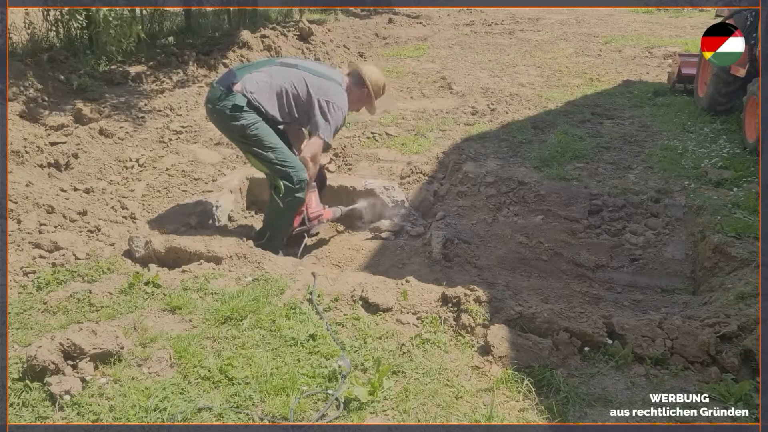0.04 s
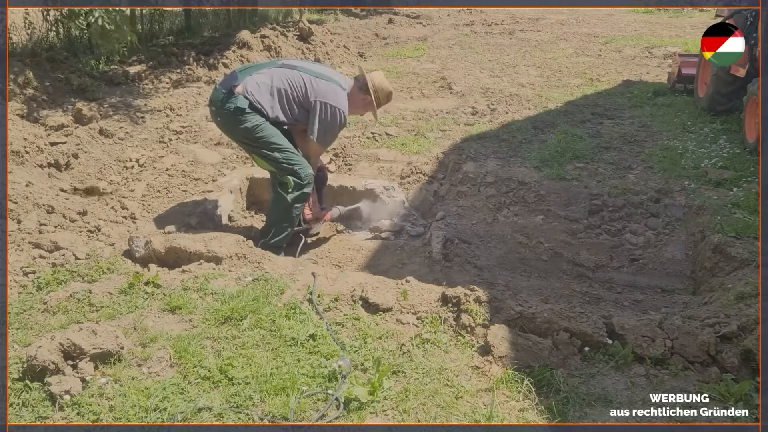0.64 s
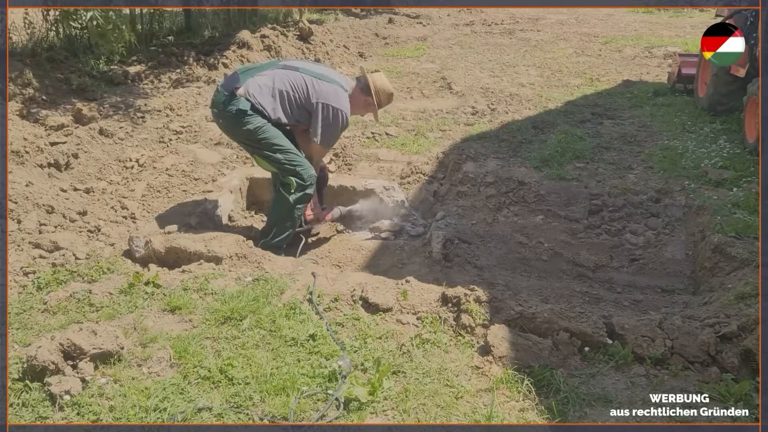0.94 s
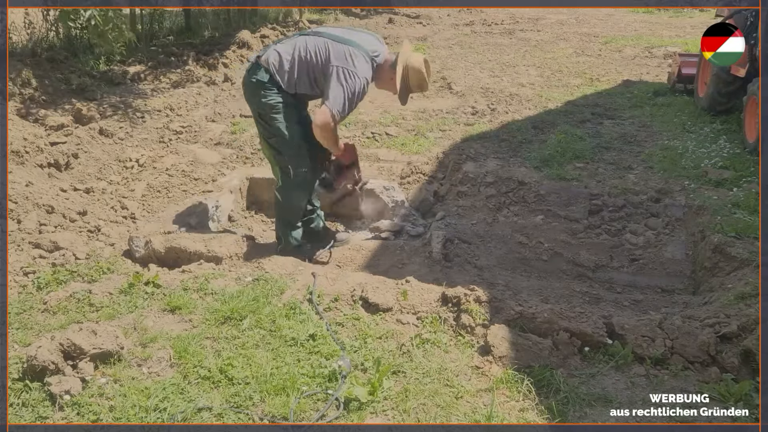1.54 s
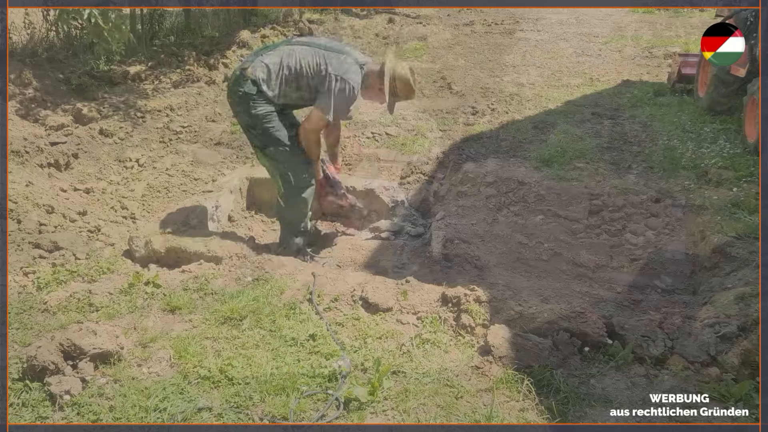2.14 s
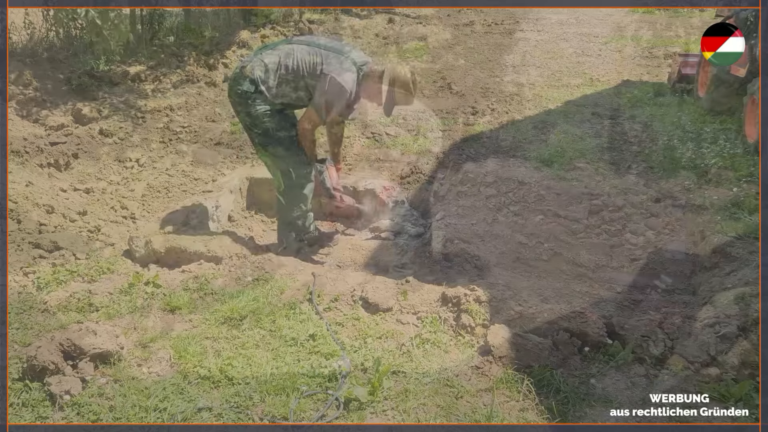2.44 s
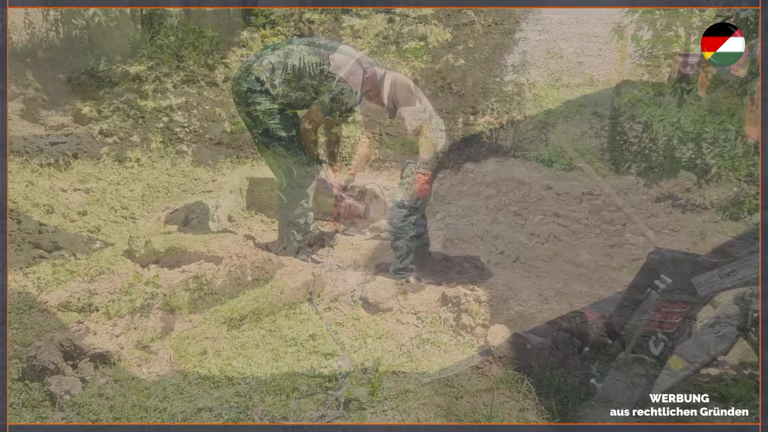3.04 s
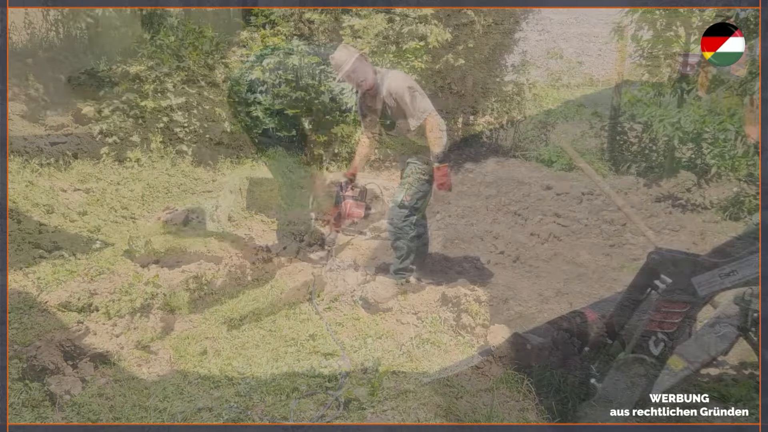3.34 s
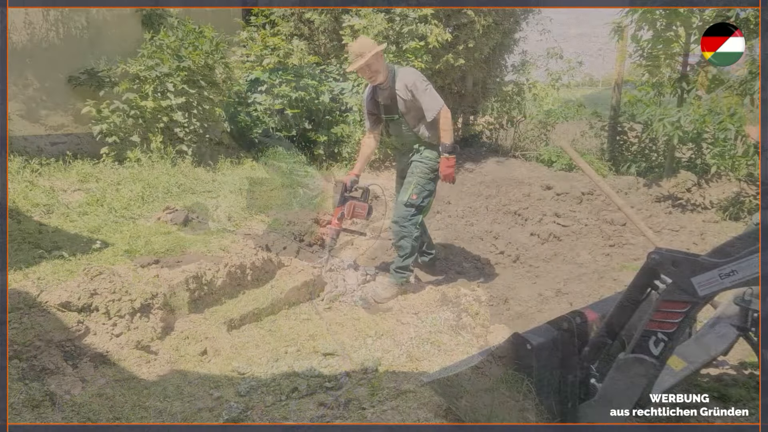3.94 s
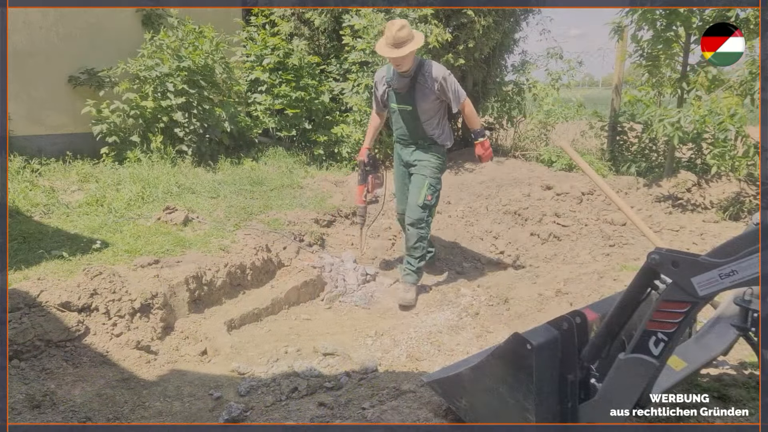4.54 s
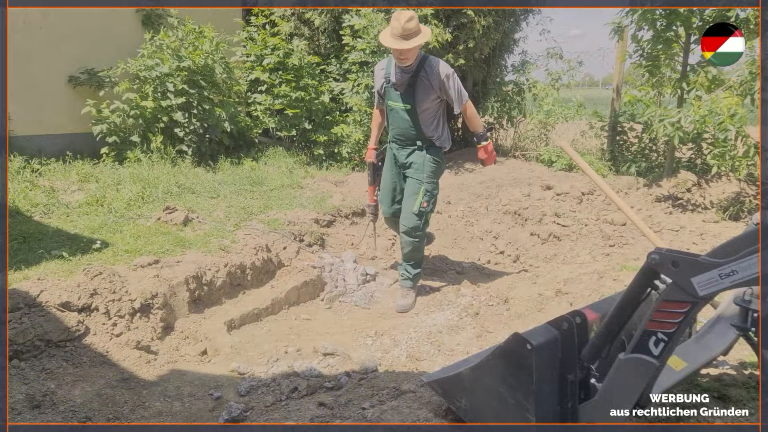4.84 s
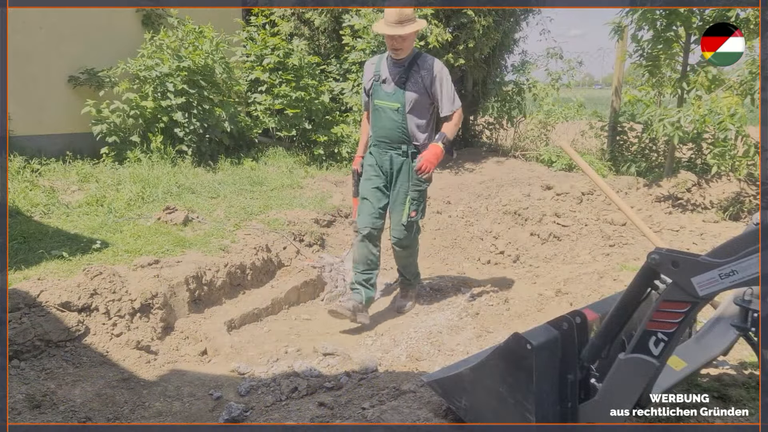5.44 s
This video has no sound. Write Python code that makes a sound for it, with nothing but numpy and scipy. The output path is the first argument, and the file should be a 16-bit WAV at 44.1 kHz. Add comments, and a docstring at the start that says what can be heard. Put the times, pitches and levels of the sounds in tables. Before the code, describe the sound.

An electric demolition hammer pounds a concrete slab in a garden, close by. Very fast blows thump and rattle, with a ringing steel chisel, cracking concrete and spraying grit. It stops briefly with a motor whir, then hammers again in several bursts that fade steadily to nothing. At the end a boot scuffs softly on dry soil, and a diesel engine idles very faintly far off in still air.

```python
"""An electric demolition hammer chisels a concrete slab in a garden, in short bursts that fade away.
Each turn of the crank thumps the slab, knocks the housing, rings the chisel and crushes grit.
Pieces split off, the steel rings bright when it bounces clear, and between bursts the motor whirs.
Underneath, a diesel idles far off in still air; boots scuff the dry soil at the end."""
import sys
import numpy as np
from scipy import signal
from scipy.fft import rfft, irfft, next_fast_len
from scipy.io import wavfile

SR = 44100
rng = np.random.default_rng(int(sys.argv[2]) if len(sys.argv) > 2 else 0)


def write(x):
    x = np.atleast_2d(x).T
    wavfile.write(sys.argv[1], SR, np.round(np.clip(x, -1, 1) * 32767).astype(np.int16))


N = 250468
TIME = np.arange(N) / SR

# EQ curves for garden air, a dragging sole, fan air, crushed concrete, fine grit and coarse gravel.
# Each row: frequency in Hz, gain in dB.
GARDEN_EQ = [(15, -65.5), (25, -25.5), (80, -9.5), (114, -18), (153, -24.5), (236, -29.5), (463, -35),
             (840, -34), (936, -36.5), (1070, -32.5), (1940, -35), (2610, -45.5), (16000, -70.5)]
SOLE_EQ = [(800, -3), (2500, 0), (3900, -12), (4700, 0), (5600, 1), (6600, -8), (8400, -5), (10000, -27),
           (15000, -30.5)]
FAN_EQ = [(59, -57.5), (100, -13), (295, -16.5), (535, -4.5), (891, -6), (970, -2), (1330, -6), (1800, 0),
          (2690, -8.5), (7770, -16.5), (9610, -28), (16000, -23.5)]
CRUSH_EQ = [(30, -3), (60, -20), (250, 7), (430, -7.5), (900, -3.5), (1500, 5.5), (2200, 7.5), (2900, 2.5),
            (4000, -1.5), (5200, 1), (7500, 7), (10000, 2), (13000, -26), (16000, -31.5)]
GRIT_EQ = [(2000, -24.5), (6000, -16.5), (9000, -5.5), (12500, 3), (13500, 7), (14200, -8.5), (15700, -2),
           (16000, -4.5)]
GRAVEL_EQ = [(1500, -26.5), (3000, -7), (3700, 0), (4700, -1), (5600, -7.5), (9000, -21)]
# EQ curves for the slab's thump, a bounce's tick and a split's snap, with the same columns.
THUMP_EQ = [(45, 5), (90, -5), (130, 7.5), (400, -4), (900, -26.5)]
TICK_EQ = [(1000, -33.5), (4500, -7), (6600, 2.5), (9000, 4), (10300, -10), (12000, -29.5)]
SNAP_EQ = [(200, -14), (1500, -8.5), (8000, -5), (15000, -29)]
# Noise bands for soil and fragments. Each row: multiple of the centre frequency, gain in dB.
SOIL_BAND = [(1 / 8, -20), (1 / 2, -12), (1, 0), (2, -16), (4, -40), (16, -65)]
DEBRIS_BAND = [(1 / 8, -30), (1 / 2, -8), (1, 0), (1.6, -9), (2.5, -35), (5, -70)]
# Partials of the idling diesel and of the free chisel. Each row: pitch in Hz, level in dB.
DIESEL_TONES = [(68.5, -58.5), (82, -59), (154, -68), (365, -78.5)]
FREE_CHISEL_TONES = [(4161, -21), (6690, -14), (8775, -3.5), (8815, -16), (9720, -25), (13070, -18)]
# Resonances of slab, housing and chisel. Each row: pitch in Hz, bandwidth in Hz, relative level in dB.
SLAB_MODES = [(141, 56, -7.5), (177, 17, 0), (228, 20, -14), (319.7, 22, -8), (350, 6.7, -2)]
HOUSING_MODES = [(526, 12, -19), (546, 23, 3.5), (692, 13, 4), (743, 77, -12.5), (844, 100, -2.5),
                 (1026, 33, -2.5), (1167, 41, -5.5), (1430, 200, -3.5), (1610, 110, -4.5)]
CHISEL_MODES = [(3480, 110, -11), (4230, 190, -4), (6520, 120, -3), (6690, 100, 1.5), (7735, 70, -9),
                (8785, 60, -8), (9720, 150, -1), (13090, 140, 1)]
# Soil shifts under tool and boots; the row at 4.272 s gives the dull low body of a concrete split. Each row:
# time and half width in seconds, centre in Hz, level in dB.
SOIL_SCUFFS = [(1.141, 0.011, 166, -23), (1.36, 0.015, 490, -45.5), (1.377, 0.0083, 250, -49),
               (2.144, 0.027, 74.6, -50), (2.187, 0.028, 66.4, -39), (4.13, 0.039, 85.1, -44),
               (4.272, 0.0074, 1103, -42.5), (5.586, .004, 1710, -56.5), (5.609, 0.0025, 1200, -48.5),
               (5.625, 0.016, 1185, -58.5)]
# Fragments scrape as the tool is shifted. Each row: start and decay in seconds, centre in Hz, level in dB.
DEBRIS_SLIDES = [(1.322, 0.0096, 4010, -54.5), (1.343, 0.0077, 5000, -54), (1.384, .004, 5500, -65),
                 (1.402, .008, 1670, -49), (1.426, .006, 4050, -63), (4.375, .006, 2570, -57)]
# The trigger is let go. Each row: release in seconds, next squeeze in seconds.
TRIGGER_RELEASES = [(1.243, 1.435), (4.295, 4.388)]
# The motor runs free between bursts. Each row: start in seconds, fan level in dB, fan treble in dB,
# nominal whine pitch in Hz, whine level in dB.
FREE_RUNS = [(1.1, -28, 2, 1141, -42), (1.95, -25, 2.5, 996, -35.5), (3.18, -26, 2.5, 1015, -46),
             (3.4, -28.5, 2, 1040, -34), (4.18, -34, -1, 1070, -55)]
# The crank slows where the tool is leaned on hardest. Each row: time in seconds, blows per second.
CRANK_RATE = [(0, 44.2), (.5, 44.4), (.9, 45), (1.5, 44.2), (1.85, 45.4), (2.2, 44.5), (2.6, 42.4),
              (2.9, 45.2), (3.3, 44.7), (4.0, 44)]
# The tip bites bare concrete. Each row: time and half width in seconds, level in dB.
TIP_BITES = [(1.472, .00045, -3), (1.4752, .003, -20), (1.4784, .0012, -8.5), (3.4465, .0006, -8)]
# The chisel bounces clear. Each row: start in seconds, time in the air in seconds, level in dB.
CHISEL_BOUNCES = [(0.076, 0.05, -15.5), (0.149, 0.025, -17), (1.945, 0.031, -9.5), (2.098, 0.025, -13.5),
                  (2.134, 0.028, -16), (2.169, 0.018, -16), (2.217, 0.015, -19), (2.241, 0.013, -14),
                  (2.284, .02, -18), (2.378, 0.027, -22.5), (2.49, .02, -23), (3.281, 0.0066, -18),
                  (3.293, 0.01, -19), (3.303, 0.041, -13.5), (3.345, 0.04, -19), (3.384, 0.024, -16),
                  (3.408, 0.0043, -19), (3.446, 0.016, -14), (3.465, 0.0057, -13), (3.485, 0.0073, -25),
                  (3.508, 0.017, -14.5), (3.533, 0.0086, -22)]
# Large pieces of concrete break off. Each row: time in seconds, level in dB.
CONCRETE_SPLITS = [(0.0483, -10), (0.3336, -9), (0.398, -7), (0.5734, -11), (0.8944, -9), (0.9634, -9),
                   (0.9705, -8), (1.0665, -11), (1.1204, -12), (1.6437, -6), (1.667, -9), (1.699, -5),
                   (1.841, -9), (1.7918, -7), (2.0986, -8), (2.3481, -11), (2.4598, -3), (2.5152, -9),
                   (2.589, -9), (2.6698, -9), (3.1692, -4.5), (3.5877, -8), (3.806, -9), (4.106, -9),
                   (4.2672, -20), (4.4214, -7)]
# The loose chisel clangs hard in its holder. Each row: time in seconds, pitch in Hz, level in dB.
HOLDER_CLANGS = [(0.212, 1740, -21), (.297, 1740, -13.5), (.334, 1740, -17.5), (.402, 1720, -12.5),
                 (.575, 1680, -12.5), (.617, 1740, -19.5), (.658, 1720, -20), (.69, 1720, -16),
                 (.743, 1720, -14), (0.794, 1750, -14), (0.821, 1740, -13.5), (0.894, 1740, -16.5),
                 (0.915, 1740, -17), (0.948, 1740, -17), (.97, 1700, -16), (1.04, 1740, -17.5),
                 (1.207, 1620, -25.5), (1.222, 1690, -22), (1.485, 1490, -14.5), (1.58, 1780, -18.5),
                 (1.643, 1780, -17), (1.666, 1760, -17.5), (1.674, 1760, -15.5), (1.697, 1780, -14.5),
                 (1.732, 1780, -15), (1.79, 1780, -13.5), (1.941, 1780, -16.5), (2.052, 1780, -28),
                 (2.07, 1780, -22), (2.095, 1780, -15), (3.215, 1780, -19.5), (4.6, 1730, -28)]
# The tip skids and the thump ducks. Each row: time and half width in seconds, thump change in dB.
TIP_SKIDS = [(0.035, 0.0078, -9.5), (0.19, 0.021, -2), (0.28, 0.017, -4.5), (0.41, 0.0088, -15),
             (1.655, 0.028, -6), (1.736, 0.024, -3.5), (1.83, .012, -21.5), (1.943, 0.011, -10.5),
             (2.265, .025, -3), (2.75, 0.072, 0), (2.96, .02, -5), (3.51, 0.027, -11)]
# The chisel is pressed on the slab. Each row: start, end and seating time in seconds, faders for thump,
# housing and ring in dB, ring pitch in Hz, chatter against the ring's tone in dB, then faders for
# high steel, crushing and fine grit in dB.
CHISEL_BURSTS = [ (-0.02, 1.126, 0.0033, -26, -28, -28, 1735, 2.5, -27.5, -23, -23.5),
                 (1.48, 1.971, 0.002, -30.5, -33, -28, 1772, -6.5, -25.5, -21, -27.5),
                 (2.098, 3.198, 0.092, -31, -32, -20.5, 1796, -4, -26.5, -24.5, -24.5),
                 (3.284, 3.398, 0.034, -30.5, -32.5, -30, 1739, -2, -28, -23.5, -41),
                 (3.483, 4.204, 0.03, -28.5, -30, -27.5, 1749, -2, -27, -23, -28),
                 (4.407, 4.794, 0.027, -41.5, -31.5, -27, 1764, 1, -27, -24.5, -29), ]

FADE_S = (2.0, 4.82)  # the whole tool fades evenly to silence between these times


def undb(db):
    """Decibels to gain."""
    return 10 ** (np.asarray(db) / 20)


def unit(x):
    """Scale to an rms of 1."""
    return x / np.sqrt(np.mean(x ** 2))


def convolve(x, response):
    """Pass a sound through a response; either may have two channels."""
    return signal.oaconvolve(np.atleast_2d(x), np.atleast_2d(response), axes=1)[:, :N]


def colour(x, points):
    """Apply a smooth EQ curve of (Hz, dB) points."""
    hz, db = np.transpose(points)
    size = next_fast_len(N + SR // 10)
    bins = np.fft.rfftfreq(size, 1 / SR)
    gain = undb(np.interp(np.log(bins + 1), np.log(hz), db))
    return irfft(rfft(x, size) * gain, size)[..., :N]


def modes(table):
    """Impulse response of a set of damped resonances."""
    t = TIME[:SR // 4]
    return sum(undb(db) * width * np.exp(-np.pi * width * t) * np.cos(2 * np.pi * hz * t)
               for hz, width, db in table)


def pulses(times, sizes):
    """One impulse at each time."""
    return np.bincount(np.clip(times * SR, 0, N).astype(int), sizes, N + 1)[:N]


def noise(mono):
    """White stereo noise; mono is the share of power common to both channels."""
    return np.sqrt(mono) * rng.standard_normal(N) + np.sqrt(1 - mono) * rng.standard_normal((2, N))


def band(shape, hz, mono):
    """A band of noise centred on hz."""
    return unit(colour(noise(mono), [(hz * ratio, db) for ratio, db in shape]))


def cracks(hits, decay_s, mono):
    """Each impulse becomes a short, fading spray of noise."""
    power = convolve(hits ** 2, np.exp(-2 * TIME[:SR // 8] / decay_s))
    return np.sqrt(np.abs(power)) * noise(mono)


def wander(hz):
    """A smooth random modulator with a spread of 1, rolling off above hz."""
    return unit(colour(rng.standard_normal(N), [(hz, 0), (hz * 4, -24), (hz * 20, -90)]))


def stereo_wander(hz):
    """A separate random modulator for each ear."""
    return np.array([wander(hz), wander(hz)])


def bump(s, half_s):
    """A smooth rise and fall around a moment."""
    return np.exp(-((TIME - s) / half_s) ** 2)


def held(table, lead_s):
    """Each column of a cue table, held from lead_s before its row starts until the next takes over."""
    rows = np.array(table)
    return rows[np.searchsorted(rows[1:, 0] - lead_s, TIME)].T


def scatter(x, decay_s, wet_db):
    """Ground and walls add a dense echo that differs at each ear."""
    t = TIME[:SR // 4]
    echo = rng.standard_normal((2, len(t))) * np.exp(-t / decay_s) * np.sqrt(2 / (decay_s * SR))
    return x + undb(wet_db) * convolve(x, echo)


def garden():
    """A bed of still air and the low beating of a distant diesel, coming up as the tool fades."""
    diesel = sum(undb(db) * np.sqrt(2) * np.sin(2 * np.pi * hz * TIME + .49 * wander(hz=2))
                 for hz, db in DIESEL_TONES)
    air = undb(-56) * unit(colour(noise(mono=.69), GARDEN_EQ))
    return undb(np.interp(TIME, FADE_S, [-3, 0])) * (diesel + air)


def soil():
    """Loose soil gives way in soft thuds and scuffs, and a split at 4.27 s gets its dull low body."""
    return sum(undb(db) * bump(s, half_s) * band(SOIL_BAND, hz, mono=.89)
               for s, half_s, hz, db in SOIL_SCUFFS)


def boot_drag(peak_s=5.065, width_s=.06, count=6000):
    """Grains of dry soil grate under a dragging sole, which lands quickly and trails off."""
    times = rng.uniform(0, N / SR, count)
    grains = pulses(times, undb(3.5 * np.minimum(rng.exponential(size=count), 2.5)))
    along = (TIME - peak_s) / width_s
    stroke = np.where(along < 0, bump(peak_s, 1.3 * width_s), 1 / (1 + along ** 2))
    return undb(-60) * stroke * unit(colour(cracks(grains, decay_s=.002, mono=.6), SOLE_EQ))


def debris():
    """Small fragments catch suddenly and slide to rest."""
    out = np.zeros((2, N))
    for s, decay_s, hz, db in DEBRIS_SLIDES:
        slide = (TIME >= s) * np.exp(-np.abs(TIME - s) / decay_s)
        out += undb(db) * slide * band(DEBRIS_BAND, hz, mono=.46)
    return out


def motor_speed(coast_s=.28, spin_up_s=.00924):
    """Share of full speed: the motor coasts down off the trigger and snaps back on the squeeze."""
    speed = np.ones(N)
    for released, squeezed in TRIGGER_RELEASES:
        lost = 1 - np.exp(-np.clip(TIME - released, 0, squeezed - released) / coast_s)
        speed -= lost * np.exp(-np.maximum(TIME - squeezed, 0) / spin_up_s)
    return speed


def motor_db(speed, load, free_db, loaded_db, stop_drop_db):
    """Ride a level between free and loaded running, and pull it down as the motor slows."""
    return free_db * (1 - load) + loaded_db * load - stop_drop_db * (1 - speed)


def fan(speed, load, hiss_lag_s=.012):
    """Fan air whirs, fainter and duller as the motor runs down; the hiss follows a little late."""
    air = unit(colour(noise(mono=.27), FAN_EQ))
    low = colour(air, [(1200, 7.5), (2500, 3.5), (6000, -28.5)])
    _, free_db, free_treble_db, _, _ = held(FREE_RUNS, lead_s=0)
    late_speed = np.interp(TIME - hiss_lag_s, TIME, speed)
    level_db = motor_db(speed, load, free_db, loaded_db=-25.5, stop_drop_db=100)
    treble_db = motor_db(late_speed, load, free_treble_db, loaded_db=3, stop_drop_db=53)
    return undb(level_db) * (low + undb(treble_db) * (air - low))


def whine(speed, load):
    """Rough tones of armature and gear stand out off load and sink with the motor's speed."""
    *_, hz, free_db = held(FREE_RUNS, lead_s=0)
    level_db = motor_db(speed, load, free_db, loaded_db=-55, stop_drop_db=59.5)
    phase = 2 * np.pi * np.cumsum(hz * speed * (1 + .023 * wander(hz=15))) / SR
    armature, gear = (np.sin(ratio * phase + .7 * wander(hz=70)) * (1 + .7 * wander(hz=90))
                      for ratio in (.97, 1.42))
    return undb(level_db) * (armature + undb(-4) * gear)


def pressed(late_s, edge_s):
    """A gate: 1 while the chisel is pressed on the slab, 0 in the pauses."""
    return sum(np.clip(np.minimum(TIME - start, end + late_s - TIME) / edge_s + .5, 0, 1)
               for start, end, *_ in CHISEL_BURSTS)


def crank():
    """Blow times at a wavering rate; now and then the striker catches the chisel early or late."""
    rate = np.interp(TIME, *np.transpose(CRANK_RATE)) * (1 + .012 * wander(hz=5))
    completed = np.floor(np.cumsum(rate) / SR)
    turns = TIME[np.flatnonzero(np.diff(completed, prepend=-1))]
    chance, slip = rng.random((len(turns), 2)).T
    return turns + (chance < .12) * (slip - .5) * .016


def blows(turns, lag_s, jitter_s, spread_db):
    """One impulse per crank turn, each a little off in time and strength."""
    late, size = rng.standard_normal((len(turns), 2)).T
    return pulses(turns + lag_s + jitter_s * late, undb(spread_db * np.minimum(size, 1)))


def bites(hz=8300):
    """Very short, bright ticks of steel on stone."""
    ticks = sum(undb(db) * bump(s, half_s) for s, half_s, db in TIP_BITES)
    return ticks * np.sin(2 * np.pi * hz * TIME + .8 * stereo_wander(hz=1000))


def bounces(free_decay_s=.05, choke_s=.0025, linger_s=.05):
    """Clear of the concrete, the steel ticks and holds a buzzing ring; landing chokes all but a trace."""
    swell, t = np.zeros(N), TIME[:SR // 4]
    trace = undb(-17) * np.exp(-t / linger_s)
    for s, air_s, db in CHISEL_BOUNCES:
        at = int(s * SR)
        choked = np.exp(-t / free_decay_s - np.maximum(t - air_s, 0) / choke_s)
        swell[at:at + len(t)] += undb(db) * (choked + trace)
    phase = .6 * stereo_wander(hz=70)
    buzz = .85 + .25 * wander(hz=200)
    ring = sum(undb(db) * np.sin(2 * np.pi * hz * TIME + phase) for hz, db in FREE_CHISEL_TONES)
    s, _, db = np.transpose(CHISEL_BOUNCES)
    tick = colour(cracks(pulses(s, undb(db)), decay_s=.0039, mono=.42), TICK_EQ)
    return swell * buzz * ring + tick


def splits():
    """Sharp cracks as pieces break away; each jolts the chisel into a short ring."""
    s, db = np.transpose(CONCRETE_SPLITS)
    snap = cracks(pulses(s, undb(db)), decay_s=.002, mono=.4)
    ring = np.std(snap) * unit(convolve(snap, modes(CHISEL_MODES)))
    return colour(snap, SNAP_EQ) + undb(-8.5) * ring


def chips(count=2600, low_hz=2300, high_hz=12000):
    """Flying splinters ping at random, each with its own pitch, decay, strength and pan."""
    out, t = np.zeros((2, N + SR // 50)), TIME[:SR // 50]
    for when, pitch, size, length, side, skew in rng.random((count, 6)):
        hz = low_hz * (high_hz / low_hz) ** pitch
        decay_s = .0013 * (.2 + length)
        ear_offset = np.array([[0], [.8 * (skew - .5)]])
        ring = np.exp(-t / decay_s) * np.sin(2 * np.pi * (hz * t + ear_offset))
        at = int(when * N)
        out[:, at:at + len(t)] += (.15 + size ** 5) * np.sqrt([[side], [1 - side]]) * ring
    return out[:, :N]


def gravel(turns):
    """Coarse gravel bursts under the tip in short, gritty cracks."""
    hits = blows(turns, lag_s=.006, jitter_s=.004, spread_db=4)
    hits += blows(turns, lag_s=.016, jitter_s=.005, spread_db=4)
    return unit(colour(cracks(hits, decay_s=.0022, mono=.35), GRAVEL_EQ))


def crushing(turns, count=900):
    """Concrete crumbles under every blow and rebound, and snaps in between."""
    hits = blows(turns, lag_s=.0058, jitter_s=.0022, spread_db=6)
    hits += 1.1 * blows(turns, lag_s=.019, jitter_s=.0029, spread_db=1.5)
    snap_times = rng.uniform(0, N / SR, count)
    snaps = pulses(snap_times, undb(4 * np.minimum(rng.exponential(size=count), 2.2)))
    crumble = unit(cracks(hits, decay_s=.015, mono=.08))
    crackle = unit(cracks(snaps, decay_s=.0008, mono=.16))
    return unit(crumble + undb(-3) * crackle)


def knocks(rows, half_s=.0034, sag_per_s=17.14):
    """A hollow clang for each (s, Hz, dB); high bending waves arrive first, so the pitch sags."""
    out = np.zeros((2, N))
    for (s, hz, db), (phase, skew) in zip(rows, rng.random((len(rows), 2))):
        near = slice(*np.searchsorted(TIME, [s - 3 * half_s, s + 3 * half_s]))
        t = TIME[near] - s
        ear_offset = np.array([[0], [.45 * (skew - .5)]])
        cycles = hz * (t - sag_per_s * t ** 2 / 2) + phase + ear_offset
        out[:, near] += undb(db) * np.exp(-(t / half_s) ** 2) * np.sin(2 * np.pi * cycles)
    return scatter(out * (1 + .3 * wander(hz=220)), decay_s=.0024, wet_db=-10)


def clatter(turns, hz, jitter_s):
    """One uneven knock per turn, left out where a holder clang is close in time and pitch."""
    late, pitch, size = rng.standard_normal((len(turns), 3)).T
    times = turns + .007 + jitter_s * late
    rows = np.transpose([times, hz * (1 + .018 * pitch), 2.2 * np.minimum(size, .8)])
    clang_s, clang_hz, _ = np.transpose(HOLDER_CLANGS)
    taken = np.any((np.abs(times[:, None] - clang_s) < .011) & (np.abs(clang_hz - hz) < 300), axis=1)
    return unit(knocks(rows[~taken]))


def housing(turns):
    """Striker and rebound knock the casing twice a turn; loose parts rattle after them."""
    hits = blows(turns, lag_s=.00299, jitter_s=.00014, spread_db=1.5)
    hits += .5 * blows(turns, lag_s=.0125, jitter_s=.0012, spread_db=5)
    rattle = undb(1.5) * unit(cracks(hits, decay_s=.0094, mono=1))
    pan = undb([[1.9], [-1.9]])
    return unit(convolve(unit(hits) + rattle, modes(HOUSING_MODES))) * pan


def high_steel(turns, groups=3):
    """Each blow rings the chisel's high modes in a new mixture."""
    ring = np.zeros((2, N))
    for k in range(groups):
        hits = blows(turns, lag_s=.008, jitter_s=.004, spread_db=2)
        ring += convolve(cracks(hits, decay_s=.008, mono=.2), modes(CHISEL_MODES[k::groups]))
    return unit(ring)


def chisel_ring(turns, hz, chatter_db):
    """The bending mode swells and is damped each turn: it sings held firmly and clatters when loose."""
    pump = np.exp(-((TIME[:SR // 40] - .008) / .0039) ** 2)
    swell = .2 + convolve(blows(turns, lag_s=0, jitter_s=.0013, spread_db=1.2), pump)
    # the swinging rod reaches each ear by changing paths
    phase = .45 * wander(hz=12) + .38 * stereo_wander(hz=25)
    tone = unit(swell * np.sin(2 * np.pi * np.cumsum(hz) / SR + phase))
    chatter = undb(chatter_db) * clatter(turns, hz=1740, jitter_s=.0022)
    return (tone + chatter) / np.hypot(1, undb(chatter_db))


def slab(turns):
    """The recoil drives the slab's low modes, which ring on into the next blow."""
    hits = blows(turns, lag_s=.00072, jitter_s=.00059, spread_db=1) * pressed(late_s=.0017, edge_s=.005)
    thump = colour(convolve(hits, modes(SLAB_MODES)), THUMP_EQ)
    pan = undb([[.4], [-.4]])
    return unit(scatter(thump, decay_s=.023, wet_db=-39)) * pan


def hammer():
    """The crank drives stone, metal and slab together; thump and grit build as the tip seats itself."""
    turns = crank()
    (start, _, seat_s, thump_db, housing_db, ring_db, ring_hz,
     chatter_db, steel_db, crush_db, grit_db) = held(CHISEL_BURSTS, lead_s=.01)
    unseated = np.exp(-np.maximum(TIME - start, 0) / seat_s)
    grit_db -= 23.5 * unseated
    thump_db -= 8 * unseated
    thump_db += 1.7 * wander(hz=28)  # uneven push on the handles
    thump_db += sum(db * bump(s, half_s) for s, half_s, db in TIP_SKIDS)
    crush = crushing(turns)
    rubble = unit(colour(crush, CRUSH_EQ)) + undb(-6.5) * unit(chips()) + undb(-9) * gravel(turns)
    stone = undb(crush_db - 2) * rubble + undb(grit_db - 1) * unit(colour(crush, GRIT_EQ))
    casing = housing(turns)
    casing += undb(-5.5) * clatter(turns, hz=720, jitter_s=.003)  # the striker's hollow clack
    ring = undb(ring_db - 1.86) * chisel_ring(turns, ring_hz, chatter_db)
    body = undb(housing_db) * casing + ring + undb(steel_db) * high_steel(turns)
    contact = pressed(late_s=.002, edge_s=.005)
    return (stone + body) * contact + undb(thump_db - .04) * slab(turns)


def scene():
    """The tool fades out with a light echo, over soil, boots and the garden bed."""
    speed, load = motor_speed(), pressed(late_s=.0079, edge_s=.025)
    impacts = hammer() + bounces() + bites() + splits() + knocks(HOLDER_CLANGS)
    tool = impacts + fan(speed, load) + whine(speed, load)
    fade = np.interp(TIME, FADE_S, [1, 0])
    return scatter(fade * tool, decay_s=.041, wet_db=-26) + soil() + debris() + boot_drag() + garden()


def record(dry):
    """A steep low-pass at 15850 Hz trims the very top."""
    return signal.sosfilt(signal.ellip(10, .2, 80, 15850, fs=SR, output="sos"), dry)


dry = scene()
out = record(dry)
write(out)
```